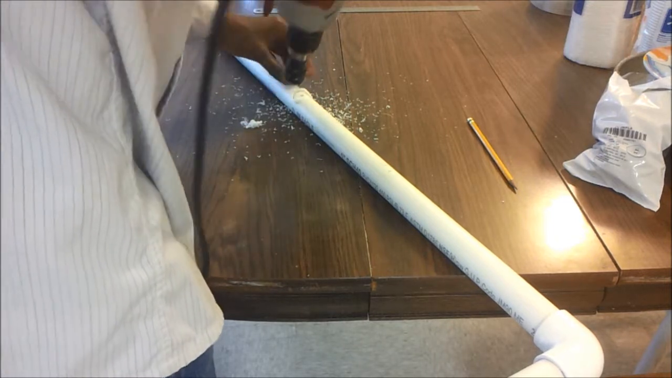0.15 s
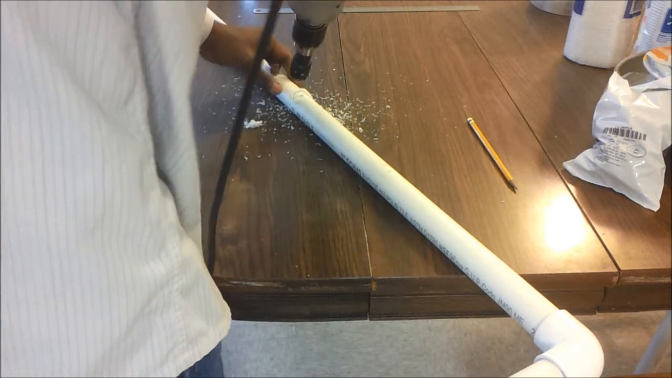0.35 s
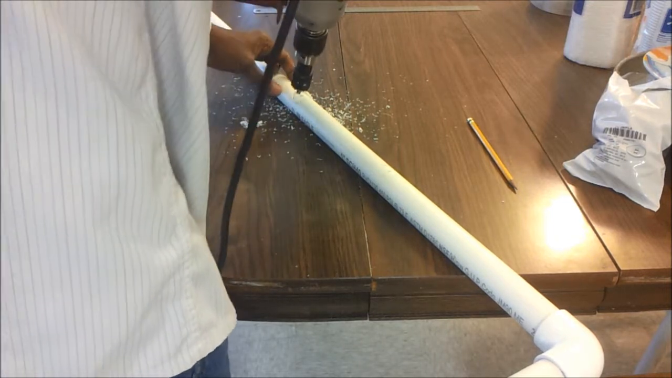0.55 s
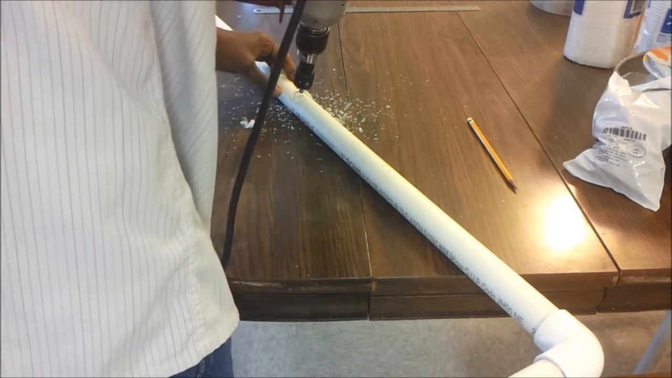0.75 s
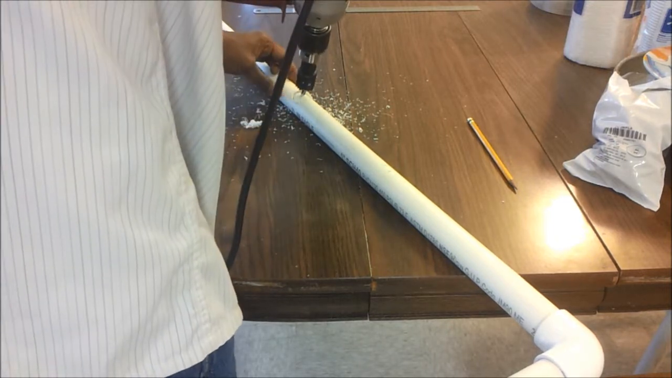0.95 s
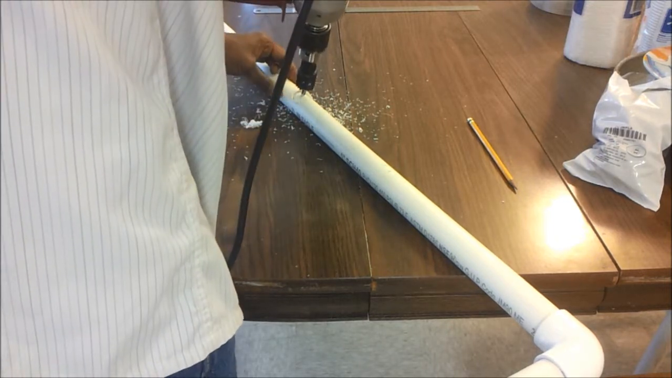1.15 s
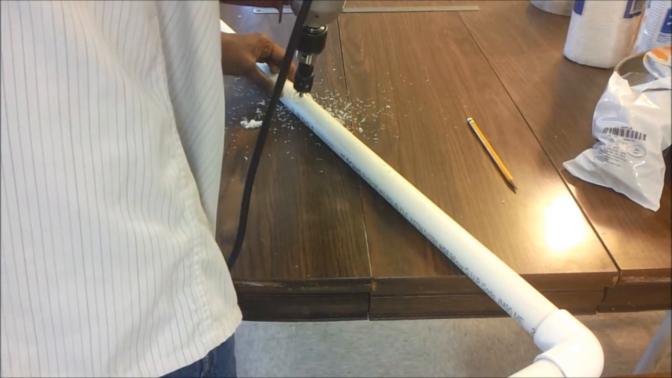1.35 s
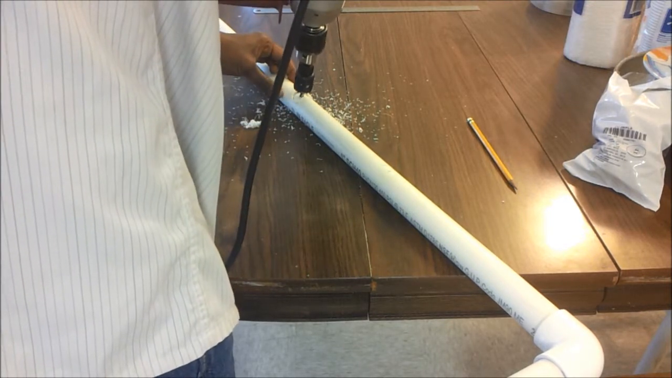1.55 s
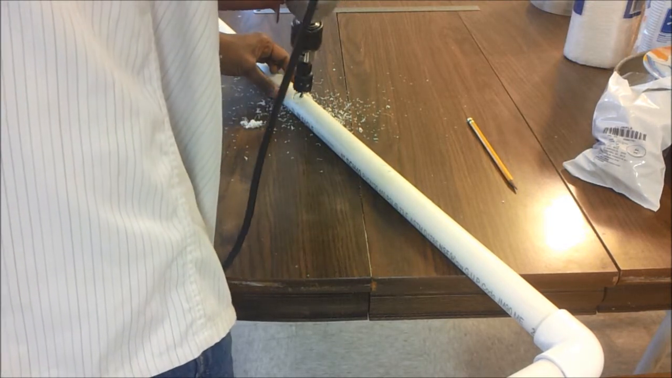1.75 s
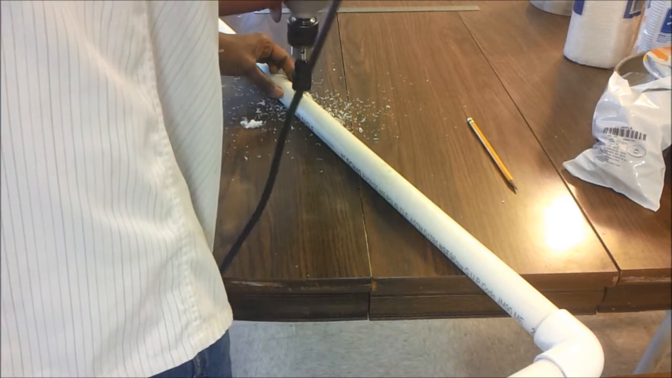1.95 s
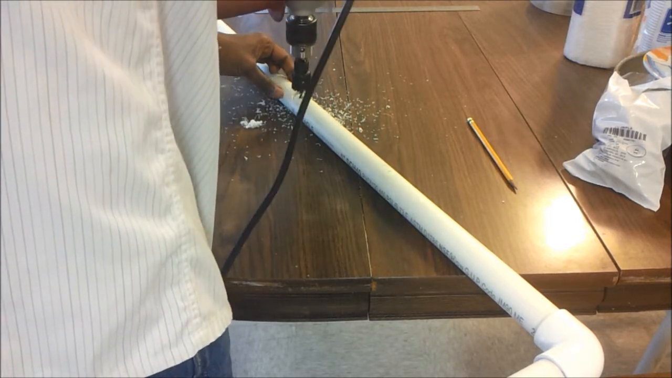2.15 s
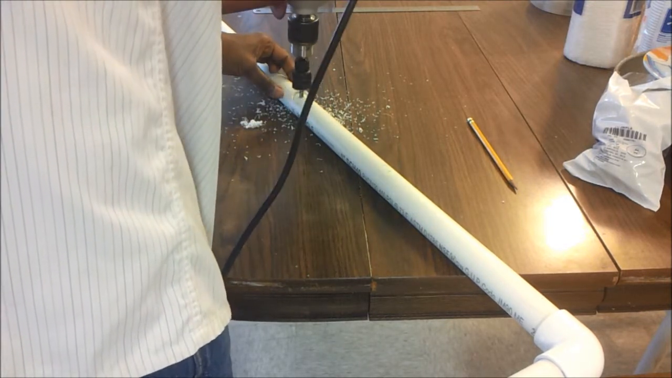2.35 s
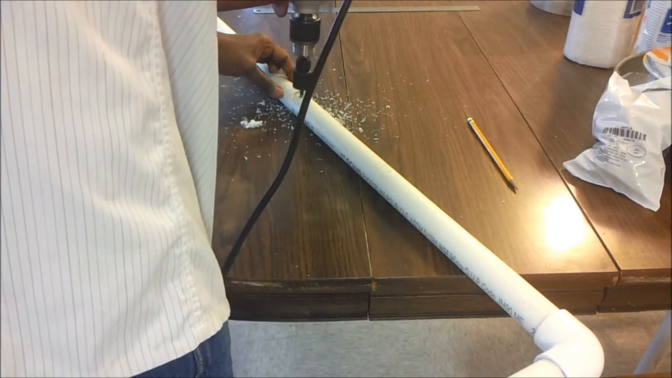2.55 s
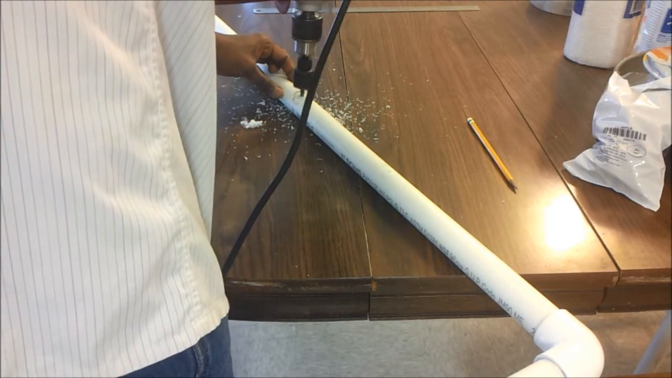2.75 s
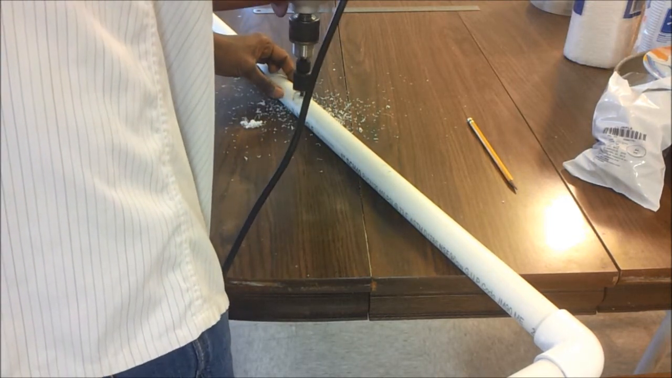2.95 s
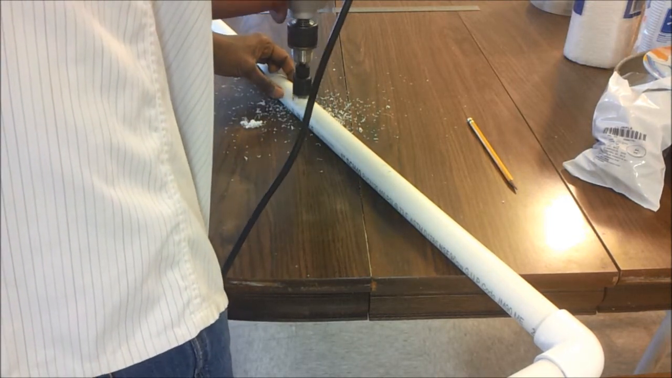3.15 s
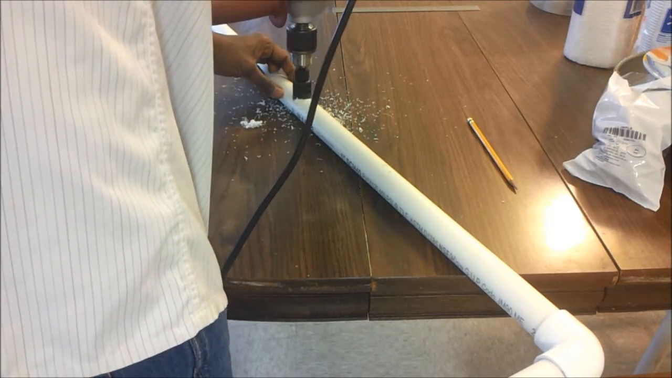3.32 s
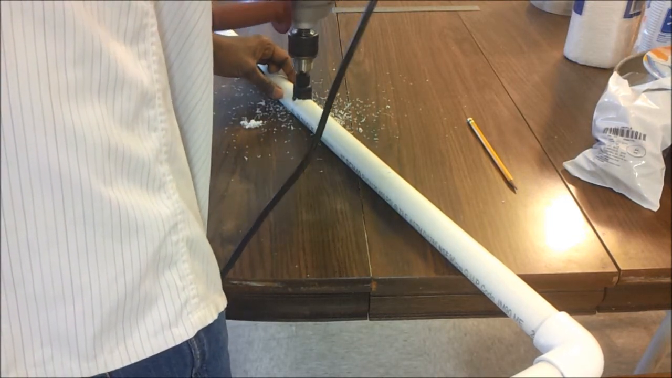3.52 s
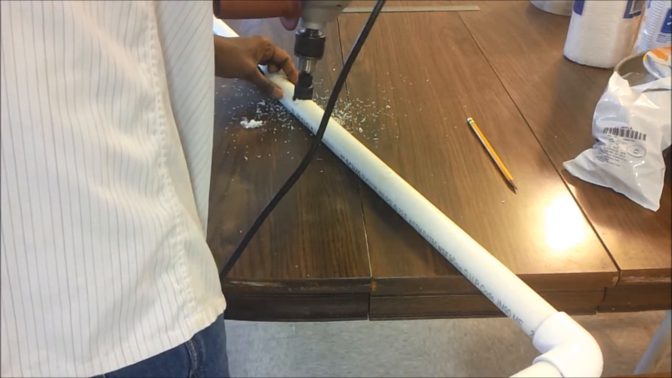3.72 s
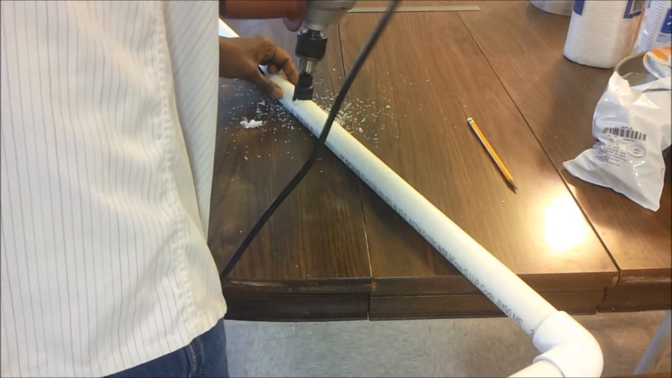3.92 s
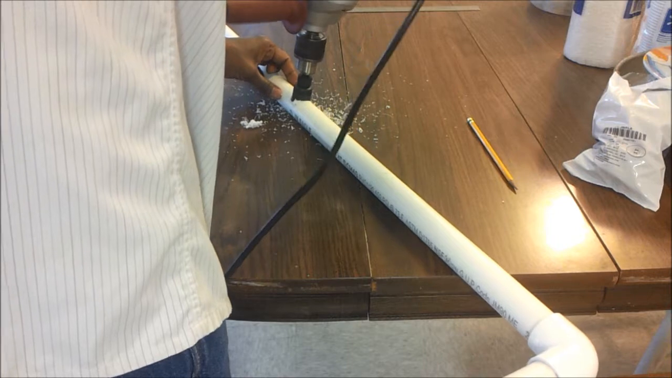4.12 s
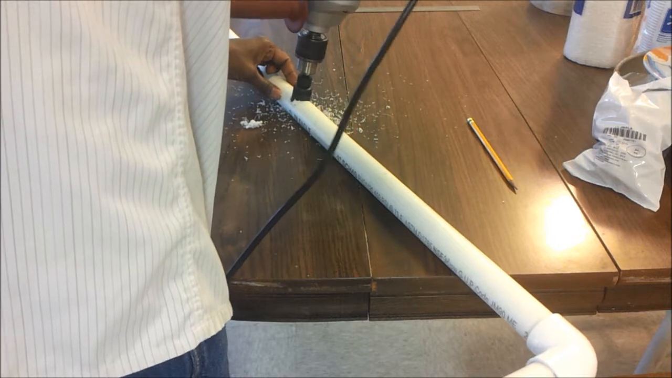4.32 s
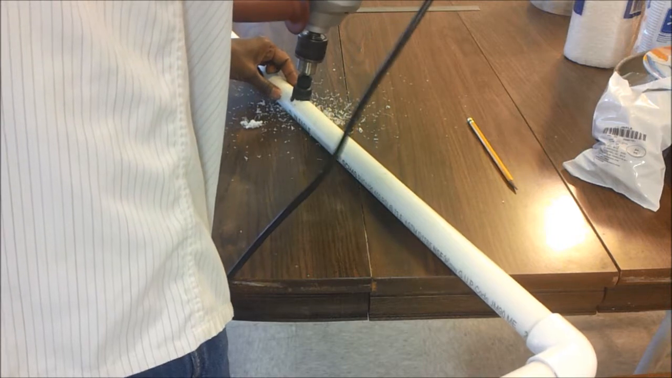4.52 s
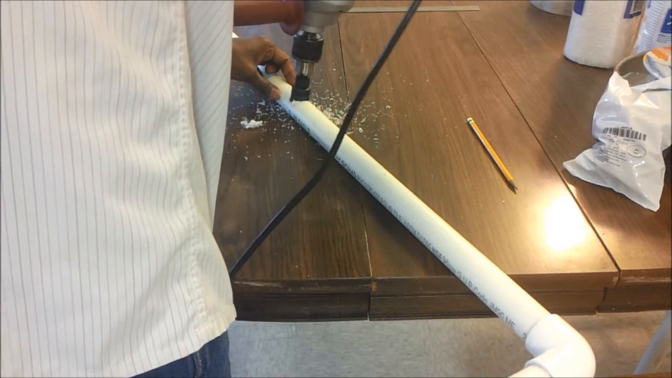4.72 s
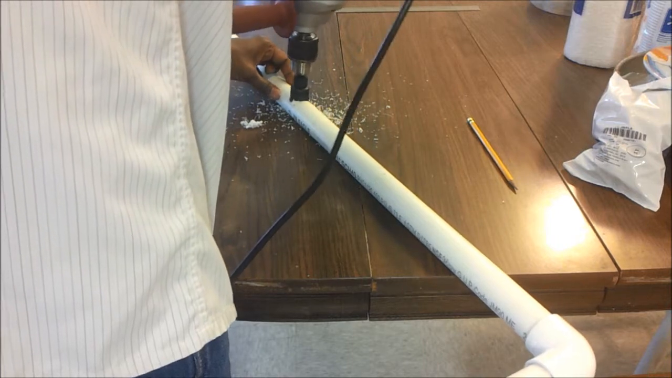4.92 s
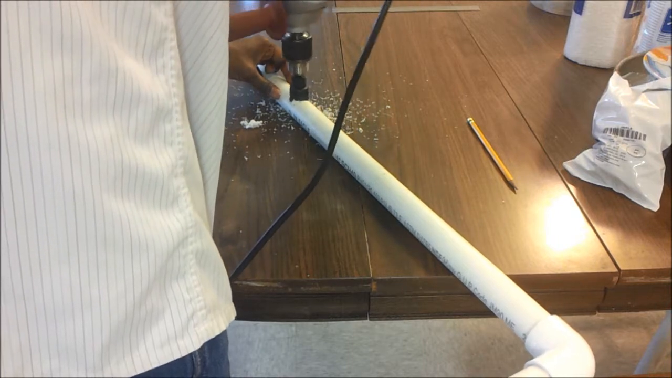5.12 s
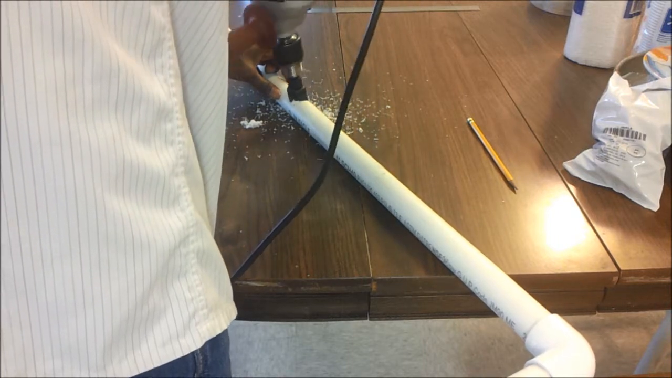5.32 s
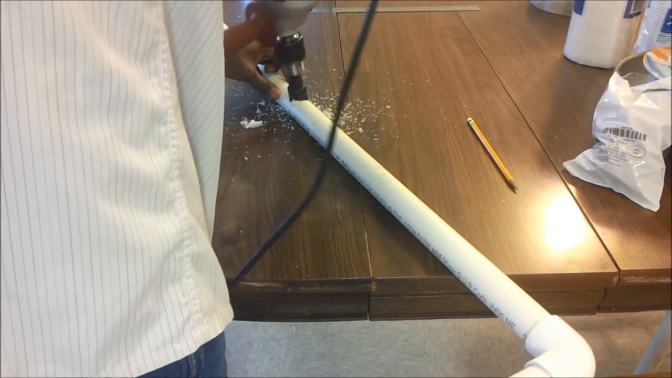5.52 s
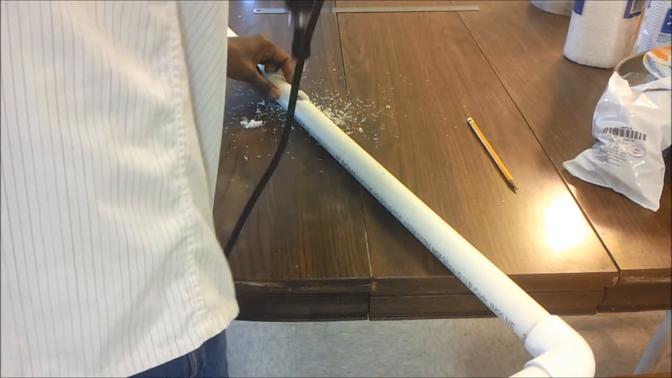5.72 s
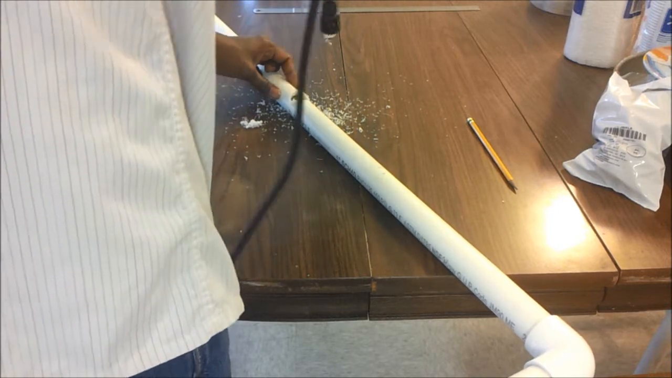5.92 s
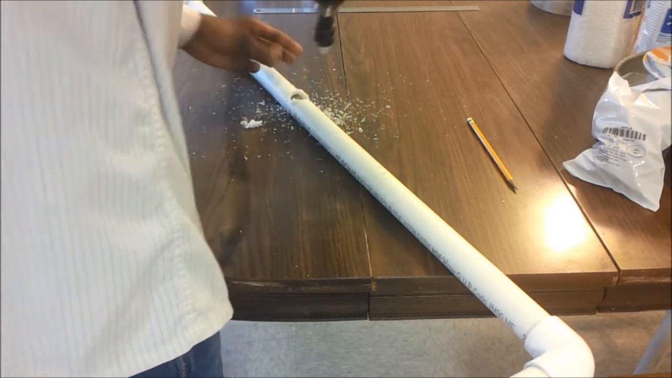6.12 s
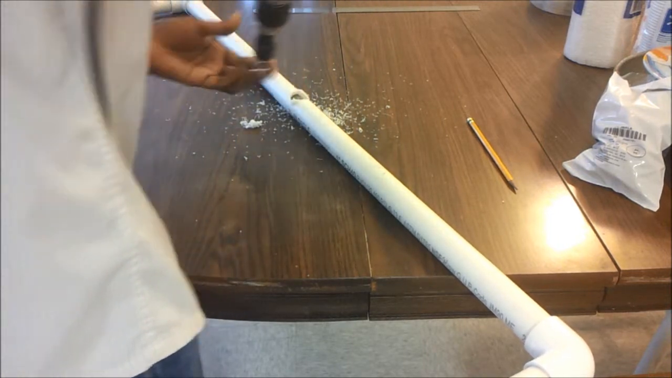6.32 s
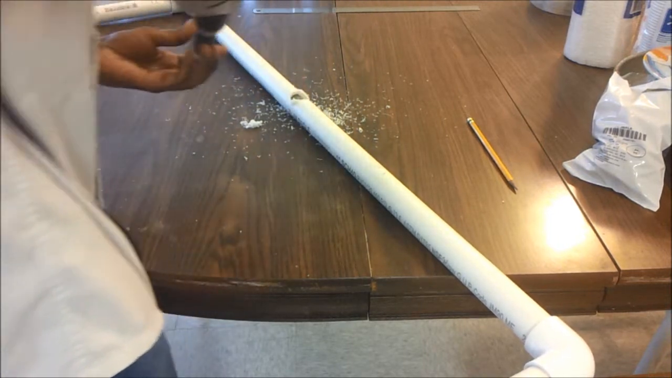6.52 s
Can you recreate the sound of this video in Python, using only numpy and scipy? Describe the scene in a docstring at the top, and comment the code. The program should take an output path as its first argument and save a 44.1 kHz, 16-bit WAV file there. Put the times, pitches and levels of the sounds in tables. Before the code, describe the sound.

A corded electric drill whines up, rasps through plastic pipe with a hole saw, then winds down with a sharp click in a small workshop.

```python
"""Hole saw through plastic pipe

A pipe is lined up on a wooden table. A corded drill buzzes on mains pulses, then hisses and whines up to
speed. The teeth rasp twice a turn and ring the saw's steel cup; the pipe rumbles over a low boom. The
saw breaks through, the drill coasts down, a last click follows. A small workshop answers."""
import sys
import numpy as np
from scipy import signal
from scipy.fft import rfft, irfft
from scipy.io import wavfile
from scipy.ndimage import map_coordinates

SR = 44100
rng = np.random.default_rng(int(sys.argv[2]) if len(sys.argv) > 2 else 0)


def log_audio(samples):
    """Write samples as a 16-bit WAV file to the path given in sys.argv[1]."""
    # one column per channel
    frames = np.atleast_2d(samples).T
    # limit to full scale, then quantise
    limited = np.clip(frames, -1, 1)
    pcm = np.round(limited * 32767).astype(np.int16)
    wavfile.write(sys.argv[1], SR, pcm)


N = 289737
T = np.arange(N) / SR

MAINS_PULSE_HZ, MOTOR_PER_SAW_TURN = 120, 16
TRIGGER_ON_S, TRIGGER_OFF_S, RELEASE_S = 2.07, 5.368, 0.0069
TEETH_TOUCH_S, DEEPEST_S, BREAKTHROUGH_S, LIFTED_S = 3.2, 4.3, 5.39, 5.55


def amp(db):
    """Decibels to gain."""
    return 10 ** (np.asarray(db) / 20)


def unit(x):
    """Scale to rms 1."""
    return x / np.sqrt(np.mean(x ** 2) + 1e-20)


def curve(rows):
    """Time table, interpolated per sample."""
    return np.interp(T, *np.transpose(rows))


def ramp(at_s, edge_s):
    """Smooth 0-to-1 step centred on at_s."""
    return .5 + .5 * np.tanh((T - at_s) / edge_s)


def between(start_s, end_s, edge_s):
    """Smooth-edged gate."""
    return ramp(start_s, edge_s) * (1 - ramp(end_s, edge_s))


def at_hz(points, hz):
    """Frequency table, interpolated on a log axis."""
    f, value = np.transpose(points)
    return np.interp(np.log(hz + 1), np.log(f + 1), value)


def colour(x, points):
    """Shape x by a spectrum, rolled off past its ends; rms 1."""
    hz = np.fft.rfftfreq(N, 1 / SR)
    rolloff = np.minimum(hz / points[0][0], 1) ** 2 / np.maximum(hz / points[-1][0], 1) ** 2
    return unit(irfft(rfft(x) * amp(at_hz(points, hz)) * rolloff, N))


def ring(x, modes):
    """Parallel resonator bank."""
    return sum(amp(db) * signal.lfilter(*signal.iirpeak(hz, hz / width_hz, SR), x)
               for hz, width_hz, db in modes)


def wander(hz):
    """Smooth random drift up to about hz; rms 1."""
    knots = rng.standard_normal(4096)
    coarse = map_coordinates(knots, [T[::16] * hz * 2], order=3, mode="wrap")
    return unit(coarse.repeat(16)[:N])


def grains(per_s, spread_db):
    """Tiny random impacts of uneven size; rms 1."""
    size = amp(spread_db * np.minimum(rng.exponential(1, N), 3)) * rng.choice([-1, 1], N)
    return unit(size * (rng.random(N) < per_s / SR))


def burst(length_s):
    """Noise with instant onset and Gaussian decay."""
    t = np.arange(SR // 4) / SR
    return rng.standard_normal(len(t)) * np.exp(-(t / length_s) ** 2)


def bandpass(x, low_hz, high_hz, order):
    """Butterworth band-pass."""
    return signal.lfilter(*signal.butter(order, [low_hz, high_hz], "bandpass", fs=SR), x)


def add(mix, at_s, sound):
    """Mix a sound in at at_s."""
    part = mix[round(at_s * SR):][:len(sound)]
    part += sound[:len(part)]


# Background spectrum: f/Hz, level/dB
ROOM_SPECTRUM = [(18, -39), (30, -37), (118, -2.5), (237, 0.5), (332, -1.5), (369, -5.5), (503, -7),
                 (1040, -15.5), (1120, -13.5), (1410, -18.5), (1570, -14.5), (1790, -20), (2430, -22.5),
                 (10400, -25.5), (14500, -28.5)]

def room_tone():
    """Faint, low, slightly wavering background noise."""
    return amp(-60 + .5 * wander(1.6)) * colour(rng.standard_normal(N), ROOM_SPECTRUM)


# Room decay: f/Hz, T60/s
WORKSHOP_DECAY = [(150, 0.038), (1000, 0.89), (4000, 0.66), (8000, 0.43), (14000, 0.31)]

def workshop(x):
    """Sparse reflections of random sign, each band decaying at its own rate."""
    taps = np.zeros(SR)
    slots = np.arange(200, SR - 20, 20)
    taps[slots + rng.integers(0, 20, len(slots))] = rng.choice([-1., 1.], len(slots))
    hz, t, bands = signal.stft(taps, SR, nperseg=256)
    early = 1 + 1.95 * np.exp(-t / 0.0067)  # table and near walls
    decay = amp(-60 * t / at_hz(WORKSHOP_DECAY, hz)[:, None])
    tail = signal.istft(bands * early * decay, SR, nperseg=256)[1]
    return signal.fftconvolve(x, tail / np.linalg.norm(tail))[:N]


# Tooth scrapes: t/s, relative level/dB, length/s
SCRATCHES = [(0.024, -71, .08), (0.765, -70, .012), (1.251, -62.5, 0.018), (1.45, -66, 0.015),
             (1.706, -62.5, 0.015), (6.467, -49.5, 0.013)]

def scratches():
    """Steel teeth scrape the plastic as the saw is placed and lifted."""
    out = np.zeros(N)
    for at_s, db, length_s in SCRATCHES:
        add(out, at_s, amp(db + 10) * bandpass(burst(length_s), 2100, 4800, order=2))
    return out


# Loose-part rattles: t/s, relative level/dB
RATTLES = [(0.121, -59.5), (0.279, -66), (.66, -63), (.85, -66), (1.037, -60), (1.35, -61), (1.56, -69),
           (1.849, -69)]
# Loose-part modes: f/Hz, width/Hz, level/dB
RATTLE_MODES = [(1113, 30, 2), (1547, 31, 1)]

def rattles():
    """A loose part rings faintly on two notes as the pipe is lined up."""
    out = np.zeros(N)
    for at_s, db in RATTLES:
        add(out, at_s, amp(db - 12.5) * unit(ring(burst(0.056), RATTLE_MODES)))
    return out


# Pipe blows: t/s, relative level/dB, length/s, low f/Hz, high f/Hz
PIPE_KNOCKS = [(0.352, -54, 0.04, 230, 380), (0.666, -57.5, 0.037, 250, 400),
               (3.439, -28, 0.027, 370, 1150), (3.503, -32, .014, 700, 1200),
               (4.699, -19, .012, 1400, 2000), (4.706, -24.5, .04, 380, 2300), (5.4, -58, .025, 35, 80),
               (5.456, -35.5, 0.057, 330, 660)]

def knocks():
    """The pipe jumps on the table: dull thumps to a hollow crack."""
    out = np.zeros(N)
    for at_s, db, length_s, low_hz, high_hz in PIPE_KNOCKS:
        blow = bandpass(burst(length_s), low_hz, high_hz, order=3)
        bandwidth_gain = np.sqrt(SR / (2 * (high_hz - low_hz)))
        add(out, at_s, amp(db - 0.5) * bandwidth_gain * blow)
    return out


# Trigger, first mains kicks, last click: t/s, level/dB, snap share/1
CLICKS = [(2.0688, -35, .9), (2.092, -33.5, .3), (2.109, -39, .5), (2.124, -39, .5), (2.15, -39, .25),
          (6.3177, -17.3, .04)]
# Drill case modes: f/Hz, width/Hz, level/dB
CASE_MODES = [(2620, 290, -5), (3300, 240, 0), (3860, 280, 4), (4320, 180, 11), (5300, 250, -4),
              (5850, 360, -7), (7810, 210, 11), (9000, 540, -7), (10700, 400, -11)]

def clicks():
    """Sharp ticks: bright snap plus ring of the drill's case."""
    out = np.zeros(N)
    blow = signal.unit_impulse(SR // 4) + .08 * burst(.001)
    snap = unit(bandpass(burst(.0025), 5200, 10500, order=3))
    case = unit(bandpass(ring(blow, CASE_MODES), 1800, 11000, order=4))
    for at_s, db, snap_share in CLICKS:
        tick = (1 - snap_share) * case + snap_share * snap
        add(out, at_s, amp(db) * tick / abs(tick).max())
    return out


# Motor speed limit under load: t/s, speed/(turns/s)
LOADED_SPEED = [(3.28, 495), (3.34, 499), (3.44, 494), (3.6, 508), (3.74, 512), (3.89, 510), (3.94, 501),
                (4.0, 500), (4.06, 488), (4.5, 489), (4.88, 518), (5.03, 539), (5.11, 530), (5.15, 513),
                (5.225, 457), (5.26, 457), (5.31, 518), (5.38, 522), (5.44, 490)]

def motor_speed(free_hz=636, spin_up_s=.8, coast_from_s=5.44, coast_s=1.134, drag_s=1.8):
    """Turns/s: run-up, load of the cut, then fan drag and friction to a stop."""
    run_up = free_hz * (1 - np.exp(-np.maximum(T - TRIGGER_ON_S, 0) / spin_up_s))
    run_down = np.expm1((coast_from_s + coast_s - T) / drag_s) / np.expm1(coast_s / drag_s)
    return np.minimum(run_up, curve(LOADED_SPEED)) * np.clip(run_down, 0, 1)


def by_speed(db, exponent, working_hz=500):
    """Gain as a power of motor speed; db at working speed."""
    return amp(db) * (motor_speed() / working_hz) ** exponent


# Two-stage trigger squeeze: t/s, edge/s, throttle step/1
SQUEEZES = [(2.219, 0.081, 0.65), (2.396, 0.021, 0.24)]

def driven(db, exponent):
    """Speed-dependent gain, trigger held."""
    throttle = sum(step * ramp(at_s, edge_s) for at_s, edge_s, step in SQUEEZES)
    return by_speed(db, exponent) * throttle * np.sqrt(1 - ramp(TRIGGER_OFF_S, RELEASE_S))


def coasting(db, exponent):
    """Speed-dependent gain, trigger released."""
    return by_speed(db, exponent) * np.sqrt(ramp(TRIGGER_OFF_S, RELEASE_S))


def motor_pulse(turns):
    """Modulation by shaft and mains; mains ripple is deeper at start-up."""
    depth = 0.06 + 0.83 * (1 - ramp(1.9, 0.2))
    mains = 1 + depth * np.cos(2 * np.pi * MAINS_PULSE_HZ * T)
    return unit(mains * (1 + 0.099 * np.cos(2 * np.pi * turns)))


# Brush spectrum, powered: f/Hz, level/dB
HISS_DRIVEN = [(4200, -3), (5000, -3), (5900, 1), (7100, 0.5), (7750, 3), (8400, 3), (9100, 3), (9520, 3),
               (9850, -2), (10700, -4.5), (11400, -7.5), (12400, -10.5), (14400, -23)]
# Brush spectrum, coasting: f/Hz, level/dB
HISS_COASTING = [(2940, -21), (5000, -9), (6110, -7), (6860, -3), (9000, -1.5), (12000, -17.5),
                 (12900, -26), (13800, -38), (14500, -28)]

def brush_hiss(pulse, inrush_s=0.027):
    """The brushes hiss in pulses, with a spurt of sparks as the rotor starts."""
    sparks = grains(9000, 2.9) * pulse
    inrush = amp(-54) * between(TRIGGER_ON_S + inrush_s / 2, TRIGGER_ON_S + 2 * inrush_s, 0.0099)
    powered = (driven(db=-26, exponent=1) + inrush) * colour(sparks, HISS_DRIVEN)
    return powered + coasting(db=-34, exponent=1.24) * colour(sparks, HISS_COASTING)


# Housing modes: f/Hz, width/Hz, level/dB
HOUSING_MODES = [(423, 13, 2.5), (547, 23, -7)]

def mains_hum():
    """Chopped mains current kicks the slow rotor and rings the housing."""
    kicks = np.maximum(np.cos(2 * np.pi * MAINS_PULSE_HZ * T), 0) ** 2 * rng.standard_normal(N)
    starting = ramp(2.13, 0.04) * (1 - ramp(2.43, 0.06))
    return amp(-51) * starting * unit(ring(kicks, HOUSING_MODES))


# Gear case spectrum: f/Hz, level/dB
GEAR_CASE = [(1200, -18), (1600, -10.5), (2050, -2), (2350, -1.5), (2700, 5), (3050, 0.5), (3400, 3.5),
             (3900, 2), (4450, 4), (4850, -15), (5500, -17), (7000, -35)]
# Hand pushes (no effect if end < start): start t/s, end t/s
PUSHES = [(3.31, 3.715), (4.032, 6), (5.114, 4.8)]

def gear_clatter(pulse, push_db=2):
    """Gears clatter in their case, more when the hand leans on the drill."""
    clatter = colour(grains(6000, 5.5) * pulse, GEAR_CASE)
    leaning = sum(between(start_s, end_s, 0.058) for start_s, end_s in PUSHES)
    powered = driven(db=-29.5, exponent=0.35) * amp(push_db * leaning)
    return clatter * (powered + coasting(db=-43.5, exponent=0.82))


# Brush ring pitch: t/s, f/Hz
BRUSH_PITCH = [(3.2, 9600), (4, 9570), (4.35, 9320), (4.8, 9660), (5.15, 9280), (5.27, 9740)]

def brush_ring(spread_hz=150):
    """Thin, high ring of the brushes: a drifting narrow band of hiss."""
    phase = 2 * np.pi * np.cumsum(curve(BRUSH_PITCH)) / SR
    band = wander(spread_hz) * np.cos(phase) + wander(spread_hz) * np.sin(phase)
    return driven(db=-35.5, exponent=0.91) * band


def contact(turns, once_db, twice_db, wobble_db):
    """The saw meets the round pipe unevenly on two sides and rocks in the hand."""
    angle = 2 * np.pi * turns / MOTOR_PER_SAW_TURN + 0.68 * wander(3)
    return unit(amp(once_db * np.cos(angle) + twice_db * np.cos(2 * angle) + wobble_db * wander(14)))


# Pipe rumble spectrum: f/Hz, level/dB
PIPE_SPECTRUM = [(40, -52), (90, -93), (135, -54), (200, -9), (320, -3), (540, -4.5), (900, 1.5),
                 (1150, -9), (1350, -4.5), (1800, -9), (2600, -2.5)]
# Pipe modes: f/Hz, width/Hz, level/dB
PIPE_MODES = [(426, 16.6, 6.5), (529, 36, 3), (714, 20, 0), (882, 53, 5), (940, 98, -3), (1015, 33, 6.5),
              (1128, 103, 3.5), (1517, 190, -4.5)]
# Pipe modes, drill coasting: f/Hz, width/Hz, level/dB
PIPE_COAST_MODES = [(862, 35, 0), (985, 50, -5)]

def pipe(turns, groove_db=-4.5):
    """Drill and cut shake the pipe, less when the groove is deep; it rings on during the coast."""
    shake = grains(3500, 1.05) * contact(turns, once_db=0.3, twice_db=2.5, wobble_db=1.5)
    body = amp(1) * colour(shake, PIPE_SPECTRUM) + amp(-2.5) * unit(ring(grains(3500, 1.9), PIPE_MODES))
    body = signal.sosfilt(signal.butter(4, 135, "highpass", fs=SR, output="sos"), body)
    running = driven(db=-36.5, exponent=1.25) + coasting(db=-44, exponent=1.8)
    depth = curve([(TEETH_TOUCH_S, 0), (DEEPEST_S, 1), (BREAKTHROUGH_S, .3)])
    cutting = amp(-34 + groove_db * depth) * between(TEETH_TOUCH_S, LIFTED_S, 0.049)
    ringing = unit(ring(ring(grains(3500, 1), PIPE_COAST_MODES), PIPE_COAST_MODES))
    return np.hypot(running, cutting) * body + coasting(db=-46, exponent=2.4) * ringing


def whine(mesh_cycles, tones, slip_cycles, flutter_db):
    """Fluttering tones at multiples of the tooth rate, blurred by backlash."""
    phase = 2 * np.pi * (mesh_cycles + slip_cycles * wander(30))
    return sum(amp(db + flutter_db * wander(19)) * np.sqrt(2) * np.sin(k * phase) for k, db in tones)


# Spindle gear tones: tooth-rate multiple/1, level/dB
SPINDLE_TONES = [(2, -21), (3, -17), (4, -2), (5, -21), (8, -12), (12, -26)]
# Spindle whine envelope: t/s, level/dB
SPINDLE_LEVEL = [(2.4, -56), (3.15, -43), (3.26, -37), (3.32, -28), (3.41, -27), (3.49, -34), (3.62, -29.5),
                 (3.8, -30), (3.89, -24.5), (3.97, -29), (4.1, -27.5), (4.4, -32), (4.68, -33),
                 (4.87, -28.5), (5.04, -36), (5.14, -31), (5.26, -30.5), (5.33, -38)]

def spindle(turns, teeth=34):
    """The spindle gear sings under load, its pitch following each sag in speed."""
    tones = whine(turns * teeth / MOTOR_PER_SAW_TURN, SPINDLE_TONES, slip_cycles=.026, flutter_db=2.6)
    second_squeeze_s = SQUEEZES[-1][0]
    return amp(curve(SPINDLE_LEVEL)) * between(second_squeeze_s, TRIGGER_OFF_S, RELEASE_S) * tones


# Hand feed force: t/s, level/dB
FEED = [(3.2, -21), (3.26, -29.5), (3.36, -32), (3.5, -26.5), (3.78, -21.5), (3.83, -24.5), (3.92, -21),
        (3.96, -24), (4.05, -22.5), (4.21, -22), (4.255, -24.5), (4.31, -21), (4.52, -22), (4.55, -29),
        (4.62, -24), (4.9, -26.5), (5.08, -36), (5.15, -30), (5.39, -28)]
# Tooth snags: t/s, level/dB, length/s
SNAGS = [(3.198, -27, .014), (3.326, -19.5, .016), (3.36, -22, .025), (3.39, -21, .022), (3.445, -23, .012),
         (3.65, -23, .0073), (3.746, -27, .014), (3.798, -21, .011), (3.866, -21, .014), (3.896, -23, .013),
         (3.93, -20, .011), (3.993, -21, .011), (4.018, -20, .012), (4.061, -22, .018), (4.188, -26, .007),
         (4.285, -20, .0074), (4.347, -22, .012), (4.485, -24, .0086), (4.582, -19, .012),
         (4.802, -24, .012), (4.84, -26, .05), (5.141, -25, .013), (5.236, -26, .018), (5.336, -25, .0097),
         (5.375, -21, .012)]

def bite():
    """Force on the teeth: hand feed plus a jolt per snag."""
    force = amp(curve(FEED)) * between(TEETH_TOUCH_S, BREAKTHROUGH_S, 0.0061)
    for at_s, db, length_s in SNAGS:
        half_s = length_s / 2
        jolt = amp(db) * np.exp(-((T - at_s - half_s) / half_s) ** 2)
        force = np.hypot(force, jolt)
    return force


# Steel cup modes: f/Hz, width/Hz, level/dB
CUP_MODES = [(2084, 30, -5.5), (2410, 60, -12), (2576, 23, -8.5), (2766, 94, -0.5), (2920, 36, -9),
             (3120, 38, -8), (3280, 66, 4.5), (3403, 87, 7), (3800, 28, 5.5), (3970, 74, 6.5),
             (4193, 120, 3.5), (4393, 134, 4), (4400, 50, -10), (4610, 150, -2.5), (4810, 150, -7)]
# Chip fizz spectrum: f/Hz, level/dB
CHIP_SPECTRUM = [(1500, -55), (3000, 1), (4500, 7), (5300, -9.5), (5850, 6), (6500, -2), (8300, 1.5),
                 (9500, 1), (11000, -5), (11900, -35), (12800, -1.5), (14300, -53)]

def saw(turns, force, rasp_db=1.5, rasp_hz=70, swell_db=2.5, swell_hz=11):
    """Teeth tear off chips, fizzing and ringing the cup; its modes swell and fade as contact shifts."""
    rasp = unit(amp(rasp_db * wander(rasp_hz))) * (1 + 0.25 * np.cos(2 * np.pi * turns))
    tearing = force * rasp * contact(turns, once_db=2.2, twice_db=2.4, wobble_db=.6)
    tears = grains(9000, 4.3)
    cup = unit(sum(amp(swell_db * wander(swell_hz)) * ring(tears, [mode]) for mode in CUP_MODES))
    fizz = colour(grains(14000, 1), CHIP_SPECTRUM)
    return tearing * (amp(-1.5) * cup + amp(-2) * fizz)


# Low boom spans: start t/s, end t/s, level/dB
BOOM_SPANS = [(3.25, 3.33, -54), (3.34, 3.5, -48), (3.52, 3.66, -48.5), (4.02, 4.145, -49.5),
              (4.195, 4.355, -47.5), (4.395, 4.525, -49.5), (4.95, 5.05, -57), (5.14, 5.19, -55),
              (5.22, 5.41, -51), (5.42, 5.48, -58)]
# Low boom tones: f/Hz, level/dB
BOOM_TONES = [(135, -0.5), (178, -5.5)]

def low_boom():
    """A low, rough boom near 135 and 178 Hz comes and goes during the cut."""
    level = sum(amp(db) * between(start_s, end_s, 0.018) for start_s, end_s, db in BOOM_SPANS)
    out = np.zeros(N)
    for hz, db in BOOM_TONES:
        phase = 2 * np.pi * hz * T + .7 * wander(12)
        out += amp(db) * unit((1 + .45 * wander(35)) * np.sin(phase) + .5 * wander(35) * np.cos(phase))
    return level * out


# Brief squeals: start t/s, end t/s, f/Hz, level/dB
SQUEALS = [(3.62, 3.84, 3262, -32.5), (3.87, 3.96, 3255, -30), (4.08, 4.45, 2080, -38),
           (4.33, 4.42, 3250, -32), (4.45, 4.72, 2088, -34.5), (4.8, 4.92, 3275, -34)]

def squeal():
    """Brief squeals near 2.1 and 3.3 kHz, mostly gear whine overtones ringing in the saw's cup."""
    out = np.zeros(N)
    for start_s, end_s, hz, db in SQUEALS:
        tone = amp(3 * wander(25) - 1) * np.sin(2 * np.pi * hz * T + .8 * wander(20))
        out += amp(db) * between(start_s, end_s, 0.019) * tone
    return out


# Pinion tones: tooth-rate multiple/1, level/dB
PINION_TONES = [(1, -11.5), (1.5, -17), (2, -13), (2.5, -15), (3, -11.5), (3.5, -15), (4, -8.5), (4.2, -14),
                (5, -9), (6, -14), (7, -12), (8, -16)]
# Gear case radiation: f/Hz, level/dB
GEAR_RADIATION = [(1000, -25), (1500, -6), (2000, -5), (2600, -9), (3200, -4), (4300, -4), (5500, -4),
                  (6300, -4), (7000, 0), (8200, -1), (9100, 2), (9900, -3), (10800, -8), (11800, -22)]

def pinion(turns, teeth=6):
    """The slack pinion's rough tones glide down once power is off."""
    tones = whine(turns * teeth, PINION_TONES, slip_cycles=.14, flutter_db=3)
    return coasting(db=-40, exponent=1.3) * colour(tones, GEAR_RADIATION)


# Saw taps in the chuck: t/s, relative level/dB, length/s
CUP_TAPS = [(5.402, -33, 0.017), (5.44, -38, .02), (5.835, -49, 0.011), (5.87, -42, 0.011),
            (5.921, -54, .012), (5.973, -45, 0.0076), (6.055, -50, .012)]
# Unloaded cup modes: f/Hz, width/Hz, level/dB
LOOSE_CUP_MODES = [(2990, 200, -4), (3280, 220, 0), (3870, 360, -2)]

def cup_taps():
    """The slowing, unloaded saw rattles in its chuck."""
    out = np.zeros(N)
    for at_s, db, length_s in CUP_TAPS:
        tap = unit(ring(ring(burst(length_s), LOOSE_CUP_MODES), LOOSE_CUP_MODES))
        add(out, at_s, amp(db) * np.sqrt(length_s / 0.23) * tap)
    return out


def scene(sway_hz=3.5):
    """One shaft angle drives drill, saw and pipe; one microphone in the room."""
    turns = np.cumsum(motor_speed()) / SR
    pulse = motor_pulse(turns)
    motor = brush_hiss(pulse) + gear_clatter(pulse) + brush_ring() + mains_hum()
    tool = motor + saw(turns, bite()) + pipe(turns) + pinion(turns)
    handling = knocks() + clicks() + scratches() + rattles() + cup_taps()
    singing = spindle(turns) + squeal()
    direct = amp(-1) * (tool + handling) + singing + low_boom()
    singing_echo = workshop(singing)
    # the spinning, swaying tool shifts between three echo paths
    sway = 2 * np.pi * sway_hz * T
    tool_echo = sum(workshop(tool * np.cos(sway + offset)) for offset in np.arange(3) * np.pi / 3)
    mono = direct + room_tone() + amp(-8) * (singing_echo + tool_echo) + amp(-3) * workshop(handling)
    return np.array([mono, mono])


def record(dry, cutoff_hz=14550):
    """Steep low-pass band limit."""
    lowpass = signal.firwin(511, cutoff_hz, window=("kaiser", 9), fs=SR)
    return signal.oaconvolve(dry, lowpass[None], "same")


dry = scene()
out = record(dry)
log_audio(out)
```